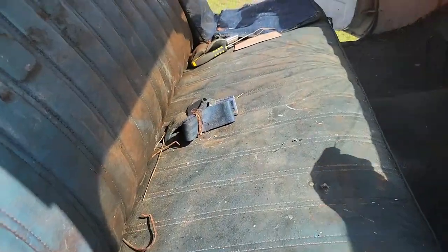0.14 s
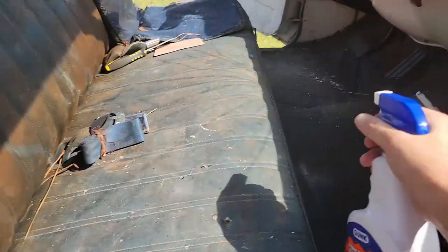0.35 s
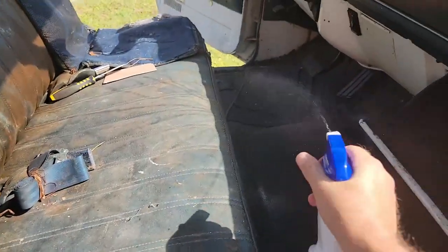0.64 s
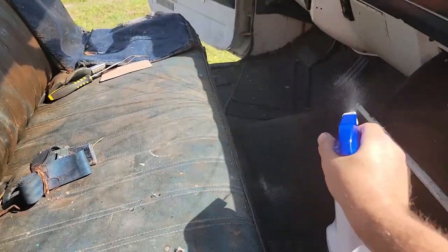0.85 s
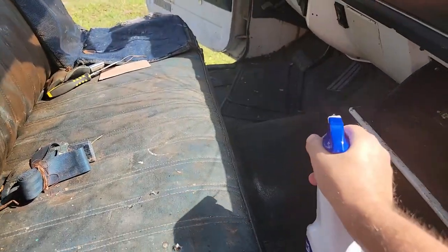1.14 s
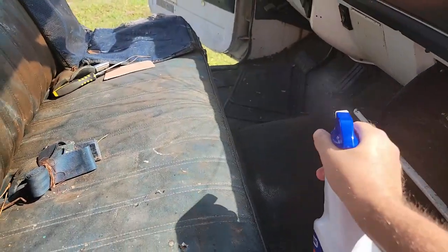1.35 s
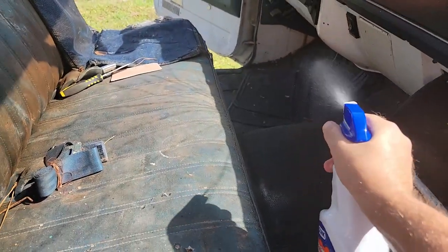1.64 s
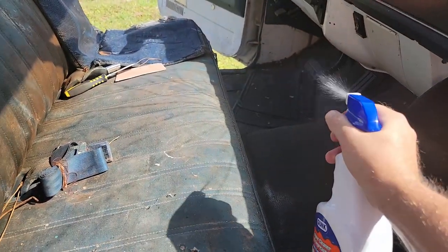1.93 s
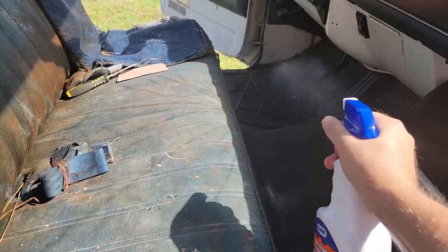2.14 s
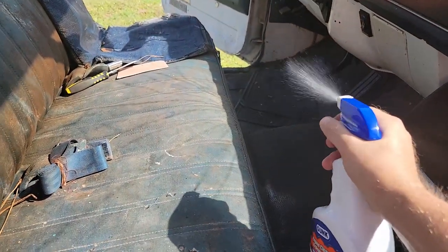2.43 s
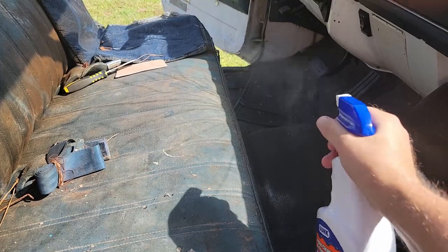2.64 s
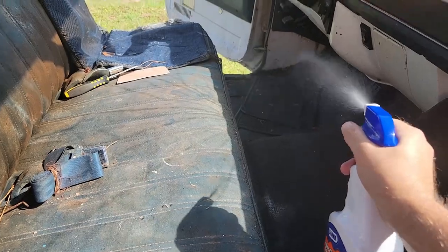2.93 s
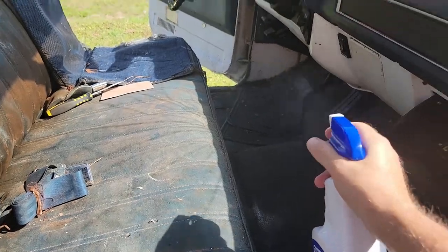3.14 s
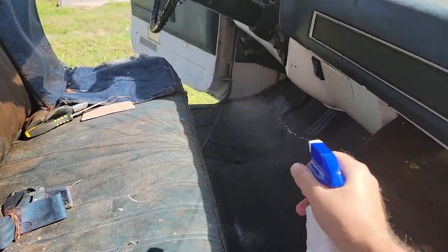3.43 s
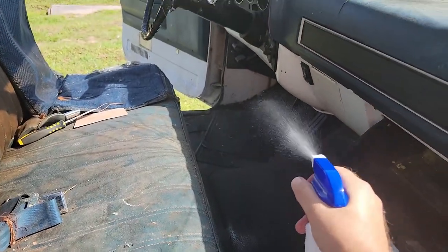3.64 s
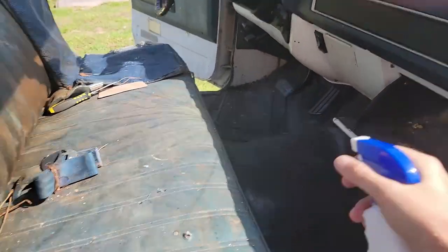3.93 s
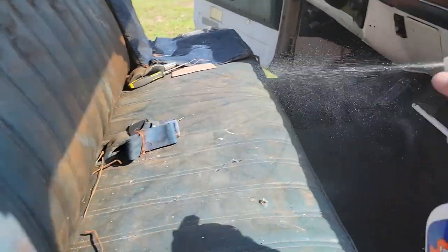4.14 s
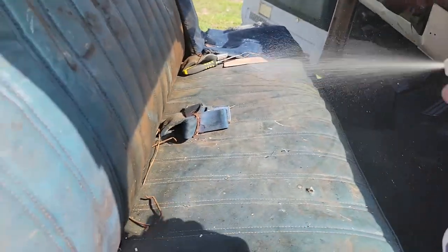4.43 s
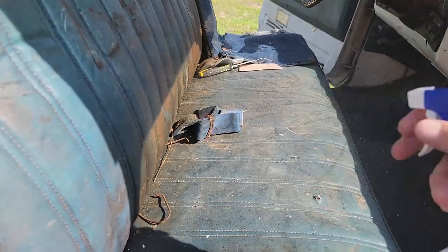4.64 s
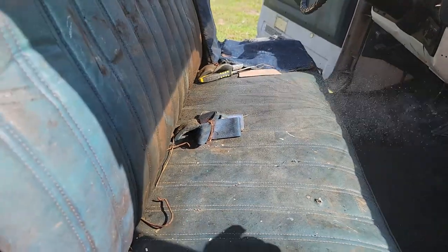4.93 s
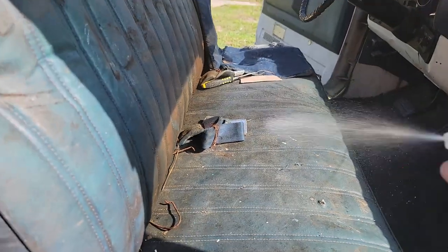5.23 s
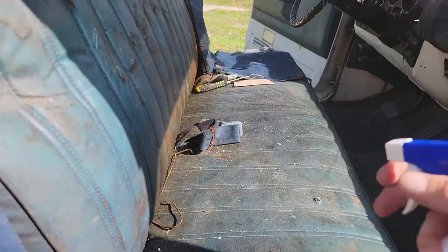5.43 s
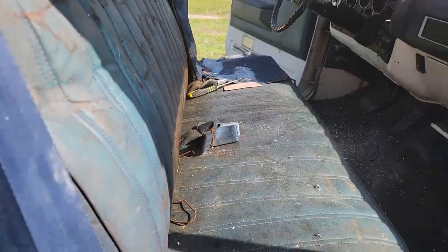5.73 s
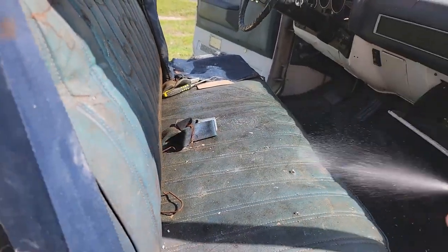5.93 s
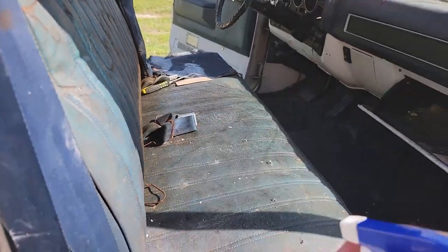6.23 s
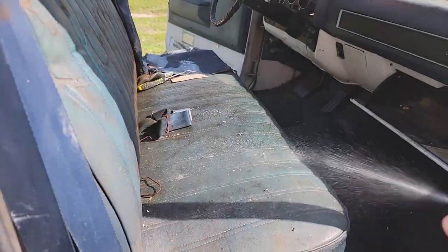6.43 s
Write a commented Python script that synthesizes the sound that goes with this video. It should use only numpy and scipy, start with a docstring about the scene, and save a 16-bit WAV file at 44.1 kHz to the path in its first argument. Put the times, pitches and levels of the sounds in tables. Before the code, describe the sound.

From the start, a plastic trigger spray bottle is pumped close to the microphone inside an open truck cab. It keeps an even pace of nearly three squirts a second, about eighteen in all, until the end at around 6.5 seconds. Each pull is a sharp plastic click followed by a bright hiss lasting about a fifth of a second, trailing into a faint patter of droplets on the seat and floor mat. Between pulls, the returning trigger makes small ticks, hollow pops and brief creaks.

Underneath, an idling engine holds a steady low hum and rumble. A sleeve rustles softly around 2.5 seconds, again from 4.2 to 4.8 seconds and near 6.3 seconds. A dull, low handling thump hits the microphone at about 4.4 seconds, with two lighter ones just after. The space sounds small and fairly dry.

```python
"""Spray bottle in an idling truck

A trigger sprayer is pumped about three times a second in an open cab. Each squeeze excites
the plastic by impact and atomises a jet, whose droplets patter on the seat and floor mat.
On release the pump refills with hollow pops and a stick-slip judder of its piston.
Beneath it the engine's periodic firing sounds a low harmonic series, and the cab booms."""
import sys
import numpy as np
from scipy import signal
from scipy.fft import rfft, irfft, next_fast_len
from scipy.io import wavfile
from scipy.ndimage import map_coordinates

SR = 44100
rng = np.random.default_rng(int(sys.argv[2]) if len(sys.argv) > 2 else 0)


def store_wav(level_fs):
    """Save 16-bit WAV to argv[1]."""
    pcm = np.round(np.clip(np.atleast_2d(level_fs), -1, 1) * 32767)
    wavfile.write(sys.argv[1], SR, pcm.T.astype(np.int16))


N = 290619
TIME = np.arange(N) / SR

# All levels are relative.
# trigger pulls: t/s, snap/dB, knock/dB, squirt length/s, jet/dB, seat/dB, mat/dB, fine mist/dB
SQUEEZES = [(-0.06, -32, -40, 0.17, -44.5, -48, -58, -55.5),
            (0.2788, -28, -36, 0.15, -44.5, -48.5, -67, -56.5),
            (0.592, -27, -33.5, 0.17, -44, -53, -67, -66),
            (0.919, -30, -35.5, 0.19, -47.5, -49.5, -59, -62),
            (1.266, -39.5, -37.5, 0.2, -46.5, -51.5, -63, -59),
            (1.655, -33.5, -44, 0.2, -43.5, -48.5, -57, -59.5),
            (2.047, -31, -42, .24, -44.5, -50, -57, -60.5),
            (2.5, -34, -36.5, 0.22, -42, -49.5, -48.5, -54.5),
            (2.928, -36.5, -43, .205, -41, -52, -63, -57.5),
            (3.3265, -28, -31.5, 0.16, -43.5, -46, -54.5, -55.5),
            (3.698, -29, -32, 0.18, -45, -46, -58, -57), (4.0874, -29.5, -42.5, 0.19, -46, -50, -47, -54),
            (4.449, -29.5, -38, 0.18, -44.5, -55, -50.5, -56.5),
            (4.8138, -29, -37, 0.24, -46, -52, -55, -58.5), (5.22, -33, -45, 0.21, -45, -47, -71, -58.5),
            (5.5854, -28.5, -40, 0.22, -44.5, -48, -56, -64),
            (6.001, -32.5, -46, 0.22, -43.5, -47.5, -54, -56),
            (6.3715, -31.5, -38, 0.2, -41, -48.5, -58, -54)]
# spectra of the spray: f/Hz, level/dB
JET_SPECTRUM = [(200, -6.5), (600, -13.5), (1300, 1), (3200, 1.5), (4600, -1.5), (6400, -0.5), (8000, -4),
                (10500, -5), (12500, -2), (15500, -0.5)]
SEAT_SPECTRUM = [(150, -7), (300, 8.5), (550, 4), (900, 2.5), (1700, 4), (2300, 6.5), (3500, -1.5),
                 (5000, -7.5), (9000, -13.5), (16000, -34)]
MAT_SPECTRUM = [(1400, -53), (2080, -13), (2270, 11.5), (2430, -10), (2800, -24), (4500, -14)]
FINE_MIST_SPECTRUM = [(200, 2), (1300, -9), (2700, -2.5), (4200, 5.5), (5400, 2), (7200, 0.5), (9400, 3),
                      (11000, -2.5), (13000, 1.5), (15500, -2)]
# resonance of the mat as the aim wanders: t/s, f/Hz
MAT_PITCH = [(0, 2274), (1.4, 2273), (1.9, 2520), (2.7, 2466), (3.4, 2385), (4.3, 2230), (5.1, 2308),
             (6.5, 2307)]
# spectra of the impacts in the mechanism: f/Hz, level/dB
SNAP_SPECTRUM = [(300, -1), (900, -2.5), (1900, -1), (2600, 0.5), (3450, -0.5), (4100, -7.5), (4900, -9.5),
                 (6050, 2.5), (7300, -9), (9000, -9), (11000, -11), (16000, -23)]
KNOCK_SPECTRUM = [(150, 8), (400, -7), (640, -3.5), (950, -3), (1300, 5), (1900, -4), (3000, -9.5),
                  (6000, -10), (16000, -52)]
HINGE_SPECTRUM = [(300, 4), (900, -3.5), (1400, 4), (2500, 6.5), (3500, 3.5), (5000, -4.5), (6300, -2.5),
                  (9000, -9.5), (16000, -13)]
SPRING_SPECTRUM = [(600, -11), (1800, 0), (2500, 4), (3400, 0.5), (4300, -10), (16000, -21)]
# modes of the spray head: f/Hz, level/dB, T60/s
HEAD_MODES = [(3270, -1, 0.026), (3640, 1.5, 0.015), (5720, -7, 0.019)]
# light impacts of the hinge and the return spring: t/s, level/dB
HINGE_TICKS = [(0.8615, -31), (1.2042, -30), (1.586, -33.5), (2.465, -35), (2.863, -33), (2.8908, -34),
               (2.9128, -33), (3.253, -28.5), (3.3043, -32), (4.2548, -34), (4.294, -36), (4.6256, -31),
               (4.6586, -31.5), (4.9082, -29.5), (5.015, -33.5), (5.1932, -32), (5.4591, -34),
               (5.5642, -30.5), (5.864, -38), (5.9, -33.5), (6.22, -32)]
SPRING_PINGS = [(0.2659, -27.5), (0.5822, -31), (1.437, -37), (2.487, -33), (2.943, -38), (3.3162, -31),
                (4.438, -34), (4.8488, -35.5), (5.208, -35), (5.416, -43), (5.574, -34), (5.796, -41),
                (5.916, -33.5), (5.991, -34), (6.296, -34)]
# pops of the valve and seal: t/s, level/dB, f/Hz
VALVE_POPS = [(0.171, -33.5, 1250), (0.471, -33, 1220), (0.4858, -29, 1370), (0.599, -30, 1450),
              (0.7862, -32, 1250), (0.7996, -36, 1260), (0.8603, -31.5, 1330), (0.949, -30, 1420),
              (1.11, -34, 1210), (1.148, -26.5, 1280), (1.204, -35.5, 1430), (1.3039, -32, 1280),
              (1.599, -33, 1344), (1.836, -32.5, 1100), (1.943, -30.5, 1310), (1.996, -33, 1370),
              (2.252, -26, 1330), (2.348, -34, 1230), (2.464, -33, 1270), (2.532, -31, 1250),
              (2.778, -33, 1160), (2.8609, -29.5, 1265), (2.8906, -31.5, 1340), (2.913, -32, 1360),
              (2.9633, -33, 1250), (3.2118, -27.5, 1220), (3.2541, -32, 1270), (3.5428, -32.5, 1280),
              (3.563, -31, 1240), (3.9935, -34, 1370), (4.0252, -30.5, 1428), (4.0707, -29, 1360),
              (4.2065, -28, 1220), (4.3068, -33, 1310), (4.3322, -31.5, 1250), (4.682, -32.5, 1400),
              (4.766, -31, 1483), (4.774, -36, 1430), (4.824, -30, 1200), (5.097, -35, 1220),
              (5.237, -35, 1270), (5.458, -28.5, 1220), (5.537, -38, 1260), (5.575, -28, 1310),
              (5.6, -31, 1260), (5.679, -35, 1200), (5.864, -31, 1160), (6.2456, -32.5, 1150)]
# judders of the returning piston: start/s, end/s, level/dB
JUDDERS = [(0.102, .17, -50), (.515, .54, -36), (0.763, .83, -40.5), (1.59, 1.69, -39.5),
           (1.949, 2.04, -39), (2.433, 2.47, -36), (2.739, 2.775, -36), (3.275, 3.295, -38),
           (3.597, 3.65, -33), (3.998, 4.06, -35.5), (4.729, 4.76, -34), (5.049, 5.175, -40),
           (5.503, 5.555, -38), (5.823, 5.849, -44), (5.904, 5.93, -43), (6.305, 6.335, -34.5)]
# modes of the pump: frequency ratio, level/dB, T60/s
PUMP_MODES = [(1, -1, 0.013), (1.53, -7.5, 0.0074), (2.55, -17, 0.0073)]
# gain of its upper modes, drier once the bottle is tipped: t/s, level/dB
UPPER_MODE_GAIN = [(4.1, -2), (4.4, 6)]
# delay of the pump's sound on the left as the bottle moves: t/s, delay/s
PUMP_LAG = [(0, .0002), (4.1, .0002), (4.4, .00026), (5.2, .00033), (5.9, .0003), (6.3, .0002)]
# whistle of the vent: t/s, f/Hz
VENT_PITCH = [(5.11, 11800), (5.171, 14120), (5.195, 12500), (5.24, 13200), (5.29, 15000), (5.38, 14700),
              (5.43, 13600), (5.505, 14800), (5.629, 12900)]
# engine speed in four-stroke cycles: t/s, f/Hz
CYCLE_RATE = [(0, 6.667), (1, 6.664), (2.5, 6.647), (3.8, 6.618), (4.8, 6.647), (5.5, 6.667), (6.6, 6.695)]
# engine harmonics: multiple of the cycle rate, level/dB
ENGINE_HARMONICS = [(8, -42), (10, -36), (12, -55), (14, -44), (16, -70), (18, -70), (20, -62), (28, -73),
                    (30, -67)]
# engine tone as the listening point moves, cab rumble, rush at the door: t/s, level/dB
ENGINE_LEVEL = [(0, .5), (1.2, 1.8), (1.8, -.5), (2.25, 2), (2.8, -1.3), (3.3, .2), (4, -.5), (5, -1),
                (6.6, -1.7)]
RUMBLE_LEVEL = [(0, -35.5), (.7, -37.5), (2.5, -38), (3.9, -39.5), (4.45, -34), (4.9, -41.5), (6.6, -40.5)]
DOOR_LEVEL = [(0, -52.5), (1, -60.5), (2.5, -65.5), (3.8, -72), (4.5, -52), (5.05, -54), (5.6, -50.5),
              (6.6, -49)]
# thumps of a foot shifting on the cab floor: t/s, level/dB
FOOT_THUMPS = [(4.387, -19.5), (4.591, -30), (4.653, -24)]
# swings of the sleeve: start/s, end/s, level/dB
ARM_SWINGS = [(.12, .29, -66), (2.25, 2.731, -43), (4.215, 4.852, -42), (5.423, 5.647, -62),
              (6.181, 6.467, -44)]
# spectra of the background: f/Hz, level/dB
RUMBLE_SPECTRUM = [(15, -44), (36, -15), (46, -18), (56, -8.5), (64, 1), (73, -16.5), (110, -11),
                   (145, -28.5), (220, -32.5), (400, -50.5), (900, -104)]
CLOTH_SPECTRUM = [(150, 1), (450, 7), (900, -1), (1500, 0), (2500, 7.5), (4200, -5.5), (5400, -1),
                  (7200, -3.5), (9400, -4.5), (11000, -5.5), (13000, -3), (15500, -6)]
AIR_SPECTRUM = [(60, 11), (220, 1.5), (380, -1.5), (500, 4.5), (640, -19), (760, 6), (950, -26), (1250, 5),
                (1600, -7), (2400, -4.5), (4000, -3.5), (4800, -1), (6000, -8.5), (7400, -33), (9000, -3),
                (10500, -15.5), (16000, -49)]
DOOR_SPECTRUM = [(150, -44), (185, 13.5), (225, 2), (340, -4), (410, -7.5), (510, 4.5), (640, -8.5),
                 (1000, -35), (3000, -50)]
# reverberation time of the cab: f/Hz, T60/s
CAB_DECAY = [(200, 0.14), (1300, 0.098), (4000, 0.068), (15000, 0.015)]
# coherence between the two microphone ports: f/Hz, coherence (0-1)
PORT_COHERENCE = [(100, .85), (250, .55), (800, .35), (1300, .5), (2400, .5), (4500, .12), (16000, .05)]
# response of the left port relative to the right: f/Hz, level/dB
PORT_BALANCE = [(60, 0.5), (200, -1), (500, -3.5), (680, -5.5), (900, 0), (1500, 0.5), (2300, 7), (3400, 1),
                (4500, 0.5), (9000, 0.5), (11000, -2), (16000, -2)]


def jet(level_db=5.0, flutter_db=-1.04, sputter_db=0.3, spit_db=-4, spit_s=0.02):
    """Atomisation: the valve opens with a spit, then liquid tears into mist with a broadband hiss."""
    noise = moving_reflection(rng.standard_normal((2, N)))
    hiss = colour(noise * amp(flutter_db * drift(400) + sputter_db * drift(50)), JET_SPECTRUM)
    envelope, t = np.zeros(N), np.arange(4096) / SR
    for s, _, _, length, jet_db, *_ in SQUEEZES:
        envelope += amp(jet_db) * squirt(s, length)
        add(envelope, s, amp(jet_db + spit_db) * np.exp(-t / spit_s))
    return hiss * amp(level_db) * envelope


def squirt(start, length, skew=1.11, hiss_power=1.27):
    """Jet noise grows as a power of pump pressure, which rises and falls in one arch per pull."""
    travel = np.clip((TIME - start) / length, 0, 1)
    pressure = abs(np.sin(np.pi * travel ** skew))
    return pressure ** hiss_power


def trigger(snap_db=1, ring_db=-4, knock_db=3, rebound_db=-9, wall_db=-6):
    """Impact excitation: the trigger snaps, the piston thuds home, and hinge and spring click."""
    piston_delay_s, wall_hz, wall_t60 = .008, 754, .09
    out, t = np.zeros((2, N)), np.arange(4096) / SR
    for s, strike_db, body_db, *_ in SQUEEZES:
        add(out, s, amp(strike_db + snap_db) * impact(SNAP_SPECTRUM, t60=.023, rise_s=.00037))
        add(out, s, amp(strike_db + ring_db) * head_ring())
        home = s + piston_delay_s
        add(out, home, amp(strike_db + rebound_db) * head_ring())
        add(out, home, amp(strike_db + rebound_db) * impact(SNAP_SPECTRUM, t60=.064, rise_s=.00048))
        add(out, home, amp(body_db + knock_db) * impact(KNOCK_SPECTRUM, t60=.05, rise_s=.00054))
        wall_mode = np.sin(2 * np.pi * (wall_hz * t + rng.random((2, 1))))
        add(out, home, amp(body_db + wall_db - 60 * t / wall_t60) * wall_mode)
    for s, db in HINGE_TICKS:
        add(out, s, amp(db) * impact(HINGE_SPECTRUM, t60=.018, rise_s=.0002))
    for s, db in SPRING_PINGS:
        add(out, s, amp(db) * impact(SPRING_SPECTRUM, t60=.014, rise_s=.0002))
    return out


def impact(spectrum, t60, rise_s):
    """Dense, heavily damped modes answer a blow with a short burst of filtered noise."""
    t = np.arange(4096) / SR
    envelope = amp(-60 * t / t60) * (1 - np.exp(-t / rise_s))
    log_gain = np.log(amp(at_frequency(spectrum, abs(np.fft.fftfreq(len(t), 1 / SR)))))
    body = np.fft.ifft(np.exp(np.conj(signal.hilbert(log_gain)))).real  # minimum phase, so causal
    force = rng.standard_normal((2, len(t))) * envelope
    return signal.fftconvolve(force, body[None, :2048] / np.linalg.norm(body), axes=1)


def head_ring(rise_s=.00066):
    """Free vibration of the spray head, its modes shifted a little by the grip."""
    t, grip = np.arange(2048) / SR, rng.uniform(1.0, 1.05)
    ring = sum(amp(db - 60 * t / t60) * np.sin(2 * np.pi * (hz * grip * t + rng.random((2, 1))))
               for hz, db, t60 in HEAD_MODES)
    return ring * (1 - np.exp(-t / rise_s))


def pump(pop_db=7.5, click_db=-11, slip_db=6, slip_hz=1360, slip_s=.014):
    """Valve pops and stick-slip friction of the returning seal excite the same pump resonances."""
    jitter, detune, vary_db = .25, .05, 2.5
    rings, clicks = np.zeros(N), np.zeros((2, N))
    for s, db, hz in VALVE_POPS:
        add(rings, s, amp(db + pop_db) * pump_ring(s, hz))
        add(clicks, s, amp(db + click_db) * impact(KNOCK_SPECTRUM, t60=.037, rise_s=.00063))
    for start, end, db in JUDDERS:
        for s in np.arange(start, end, slip_s):
            late, louder, higher = rng.standard_normal(3)
            slip = pump_ring(s, slip_hz * (1 + detune * higher))
            add(rings, s + late * jitter * slip_s, amp(db + slip_db + vary_db * louder) * slip)
    return place(rings, follow(PUMP_LAG)) + clicks


def pump_ring(s, hz, rise_s=.00039, vary_db=2.5, detune=.04):
    """Damped modes ring briefly after a jerk; the upper ones vary from one jerk to the next."""
    t = np.arange(1024) / SR
    ring = np.zeros(len(t))
    for k, (ratio, db, t60) in enumerate(PUMP_MODES):
        is_upper = k > 0
        louder, higher = rng.standard_normal(2) * is_upper
        level_db = db + vary_db * louder + follow(UPPER_MODE_GAIN, s) * is_upper
        mode_hz = hz * ratio * (1 + detune * higher)
        ring += amp(level_db - 60 * t / t60) * np.sin(2 * np.pi * mode_hz * t)
    return ring * (1 - np.exp(-t / rise_s))


def patter(drum_db=-4.5, drops_per_s=3000, spread_db=3):
    """Shot noise: random droplets strike the vinyl seat and drum on the resonant rubber mat."""
    sizes = amp(spread_db * np.minimum(rng.exponential(1, N), 4))
    drops = sizes * (rng.random(N) < drops_per_s / SR)
    seat = colour(moving_reflection(drops * rng.standard_normal((2, N))), SEAT_SPECTRUM)
    mat = colour(drops * rng.standard_normal((2, N)), MAT_SPECTRUM)
    mat = retune(mat, from_hz=MAT_SPECTRUM[2][0], to_hz=follow(MAT_PITCH))
    starts, *_, seat_db, mat_db, _ = np.transpose(SQUEEZES)
    flight = dict(delay_s=.01, rise_s=.06, hold_s=.19, fade_db_per_s=45)
    return seat * landing(starts, seat_db, **flight) + mat * landing(starts, mat_db + drum_db, **flight)


def fine_mist(level_db=4):
    """Drag keeps the finest droplets aloft longer; they fizz as they settle."""
    starts, *_, mist_db = np.transpose(SQUEEZES)
    fall = landing(starts, mist_db + level_db, delay_s=.043, rise_s=.083, hold_s=.12, fade_db_per_s=38)
    return colour(rng.standard_normal((2, N)), FINE_MIST_SPECTRUM) * fall


def landing(starts, levels_db, delay_s, rise_s, hold_s, fade_db_per_s):
    """Each shower arrives, holds and thins out; being incoherent, showers add in power."""
    t = TIME[::64]
    age = t - starts[:, None] - delay_s
    fade_db = fade_db_per_s * np.maximum(age - rise_s - hold_s, 0)
    showers = np.clip(age / rise_s, 0, 1) * amp(levels_db[:, None] - fade_db)
    return np.interp(TIME, t, np.linalg.norm(showers, axis=0))


def vent(level_db=-63, tremble=.015, flicker_db=5, fade_s=.02):
    """A flow tone: air drawn back into the bottle gives a thin, broken whistle."""
    cycles = np.cumsum(follow(VENT_PITCH) * (1 + tremble * drift(700))) / SR
    start, end = VENT_PITCH[0][0], VENT_PITCH[-1][0]
    opening = np.clip(np.minimum(TIME - start, end - TIME) / fade_s, 0, 1)
    whistle = opening * amp(level_db + flicker_db * drift(50)) * np.sin(2 * np.pi * cycles)
    return np.array([whistle, whistle])


def engine(level_db=0.43, drone_db=-35, drone_hz=60, waver=.13, lope_rad=.2, zero_phase_s=.09):
    """Uneven firing modulates a harmonic series, which beats against a steady low drone."""
    cycles = np.cumsum(follow(CYCLE_RATE)) / SR - zero_phase_s * CYCLE_RATE[0][1]
    harmonics = np.zeros(N)
    for k, db in ENGINE_HARMONICS:
        strength = amp(db) * (1 + waver * drift(5))
        harmonics += strength * np.cos(2 * np.pi * round(k) * cycles + lope_rad * drift(5.3))
    drone_phase = 2 * np.pi * drone_hz * (TIME - zero_phase_s) + 2 * lope_rad * drift(1.77)
    tone = harmonics + amp(drone_db) * np.cos(drone_phase)
    return place(np.sqrt(2) * amp(level_db + follow(ENGINE_LEVEL)) * tone, lag_s=-.0003)


def rumble():
    """The cab's low resonances boom, nearly alike on both sides at these long wavelengths."""
    common = colour(rng.standard_normal(N), RUMBLE_SPECTRUM)
    diffuse = colour(rng.standard_normal((2, N)), RUMBLE_SPECTRUM)
    return amp(follow(RUMBLE_LEVEL)) * (common + 0.5 * diffuse)


def foot_thumps(thump_hz=72, swell_s=.016):
    """Damped oscillation: low, dull thumps of a foot shifting on the cab floor die within a few cycles."""
    out, t = np.zeros(N), np.arange(8192) / SR
    envelope = t / swell_s * np.exp(1 - t / swell_s)
    for s, db in FOOT_THUMPS:
        add(out, s, amp(db) * envelope * np.sin(2 * np.pi * thump_hz * t))
    return out


def sleeve(grain_db=0.5):
    """Friction noise of cloth follows sliding speed, greatest in the middle of each swing."""
    speed = sum(amp(db) * np.sin(np.pi * np.clip((TIME - start) / (end - start), 0, 1))
                for start, end, db in ARM_SWINGS)
    friction = rng.standard_normal((2, N)) * amp(grain_db * drift(300))
    return speed * colour(friction, CLOTH_SPECTRUM)


def air(level_db=-52):
    """Broadband noise of the engine and the outdoors, with a hollow resonance near the door."""
    rush = amp(level_db) * colour(rng.standard_normal((2, N)), AIR_SPECTRUM)
    return rush + amp(follow(DOOR_LEVEL)) * colour(rng.standard_normal((2, N)), DOOR_SPECTRUM)


def moving_reflection(x, delay_s=.001094, echo_gain=.3, sway=.16):
    """Comb filtering: a faint echo off the moving hand and bottle makes shifting spectral peaks."""
    earlier = TIME - delay_s * np.exp(sway * drift(3))
    return np.array([side + echo_gain * np.interp(earlier, TIME, side) for side in x])


def cab_reverb(x, wet_db, gap_s=.00284, echoes_per_s=2500):
    """Reflections from dash, roof and doors die fast; three patterns crossfade as the bottle moves."""
    out = x.copy()
    for spot in range(3):
        echoes = rng.standard_normal((2, 8192)) * (rng.random((2, 8192)) < echoes_per_s / SR)
        hz, t, spectra = signal.stft(echoes, SR, nperseg=128)
        decay = amp(-60 * t / at_frequency(CAB_DECAY, hz)[:, None])
        tail = signal.istft(spectra * decay, SR, nperseg=128)[1]
        tail *= np.arange(tail.shape[1]) > gap_s * SR
        tail /= np.linalg.norm(tail, axis=1, keepdims=True)
        weight = np.sqrt(2 / 3) * np.cos(np.pi * (TIME + spot / 3))
        out += amp(wet_db) * signal.fftconvolve(x * weight, tail, axes=1)[:, :N]
    return out


def ports(x, lag_s=.00022):
    """Partial coherence: sound from the right reaches the left port later, most alike in the bass."""
    hz, (left, right) = np.fft.rfftfreq(N, 1 / SR), rfft(x)
    coherence = at_frequency(PORT_COHERENCE, hz)
    delayed = right * np.exp(-2j * np.pi * hz * lag_s)
    return irfft([coherence * delayed + np.sqrt(1 - coherence ** 2) * left, right], N)


def place(x, lag_s):
    """Arrival time gives direction: a positive lag on the left puts the source to the right."""
    return np.array([np.interp(TIME - lag_s, TIME, x), x])


def retune(x, from_hz, to_hz):
    """Frequency shifting slides a narrow resonance from its own pitch onto a curve."""
    analytic = signal.hilbert(x, next_fast_len(N))[..., :N]
    return (analytic * np.exp(2j * np.pi * np.cumsum(to_hz - from_hz) / SR)).real


def amp(db):
    """Decibels to amplitude ratio."""
    return 10 ** (np.asarray(db) / 20)


def unit(x):
    """Scales to rms 1."""
    return x / np.sqrt(np.mean(x ** 2) + 1e-20)


def follow(rows, t=TIME):
    """Value of a curve at the times t."""
    return np.interp(t, *np.transpose(rows))


def at_frequency(points, hz):
    """Interpolates on a logarithmic frequency axis."""
    f, value = np.transpose(points)
    return np.interp(np.log(hz + 1), np.log(f + 1), value)


def colour(x, spectrum):
    """Filters x by a spectrum and scales it to rms 1."""
    size = next_fast_len(N, real=True)
    gain = amp(at_frequency(spectrum, np.fft.rfftfreq(size, 1 / SR)))
    return unit(irfft(rfft(x, size) * gain, size)[..., :N])


def drift(rate_hz):
    """Continuous random fluctuation of rms 1."""
    knots = rng.standard_normal(8192)
    return unit(map_coordinates(knots, [TIME * rate_hz], order=1, mode="wrap"))


def add(mix, s, sound):
    """Superposes a sound on the mix at s seconds."""
    start = round(s * SR)
    sound = sound[..., max(-start, 0):]
    part = mix[..., max(start, 0):][..., :sound.shape[-1]]
    part += sound[..., :part.shape[-1]]


def scene():
    """Superposition of the bottle, its reflections and the idling truck."""
    plastic = cab_reverb(ports(trigger()), wet_db=-6) + cab_reverb(pump(), wet_db=-9.5)
    idle = engine() + rumble()
    diffuse = ports(air() + patter() + sleeve())
    return jet() + fine_mist() + vent() + plastic + diffuse + idle + foot_thumps()


def record(dry, cutoff_hz=16050):
    """Linear filtering: each port colours its side, and a low-pass limits the band."""
    tilt_db = at_frequency(PORT_BALANCE, np.fft.rfftfreq(N, 1 / SR)) / 2
    heard = irfft(rfft(dry) * amp([tilt_db, -tilt_db]), N)
    lowpass = signal.firwin(511, cutoff_hz, window=("kaiser", 9), fs=SR)
    return signal.oaconvolve(heard, lowpass[None], "same")


dry = scene()
out = record(dry)
store_wav(out)
```